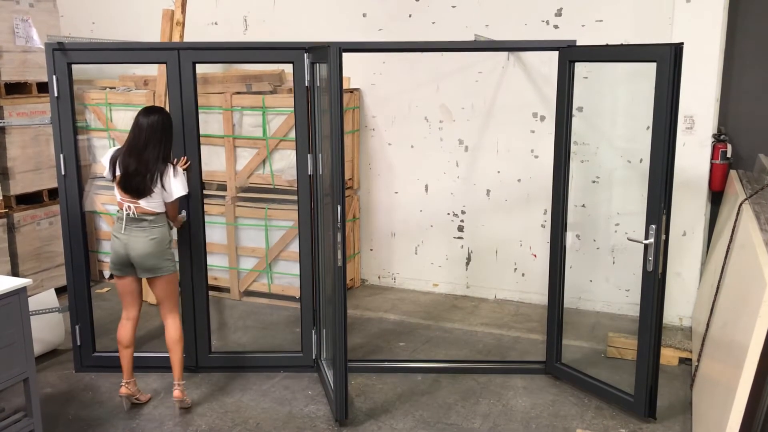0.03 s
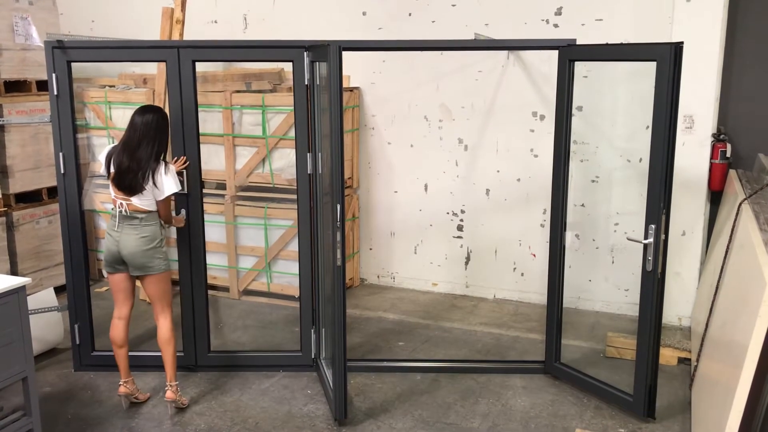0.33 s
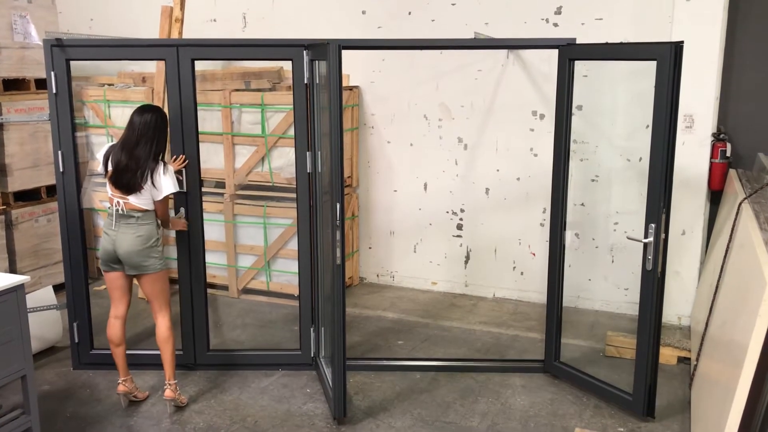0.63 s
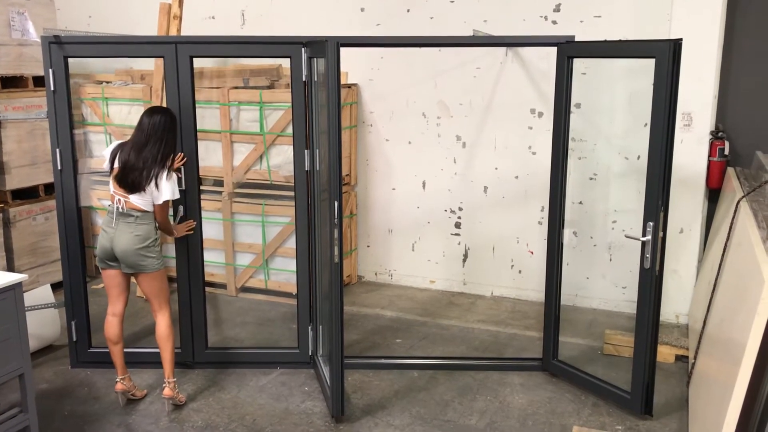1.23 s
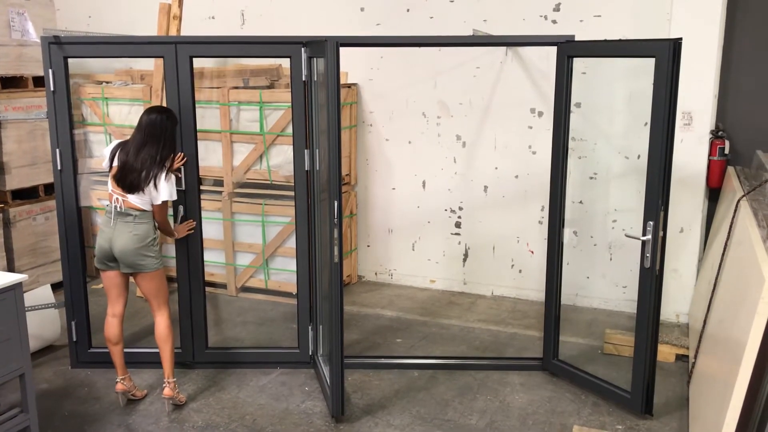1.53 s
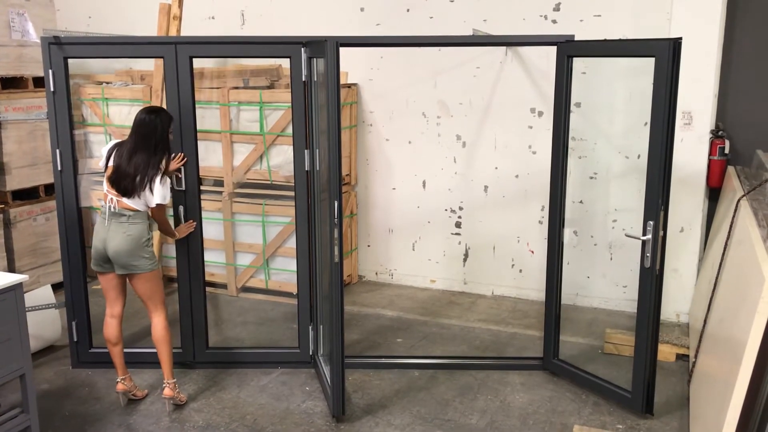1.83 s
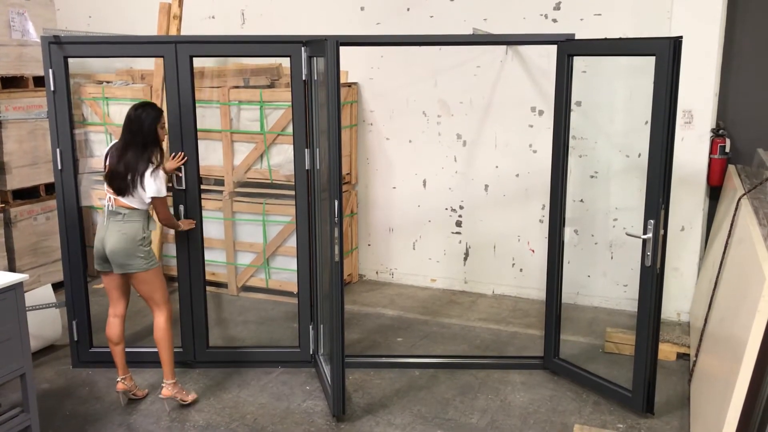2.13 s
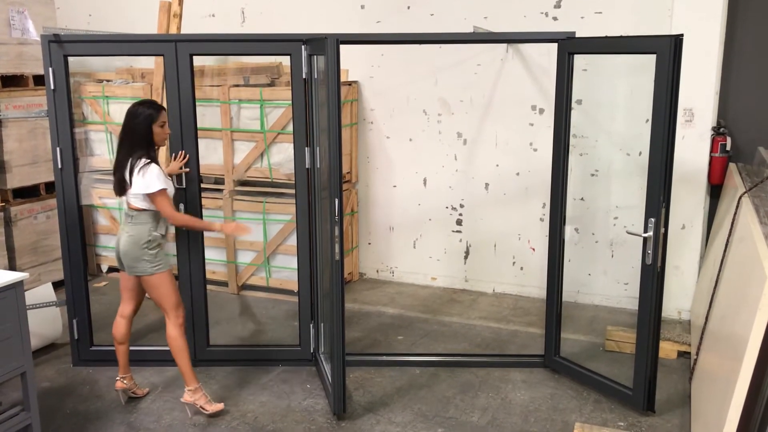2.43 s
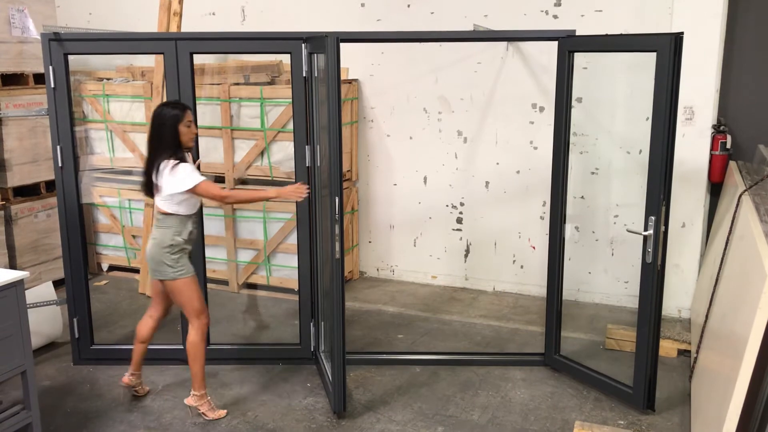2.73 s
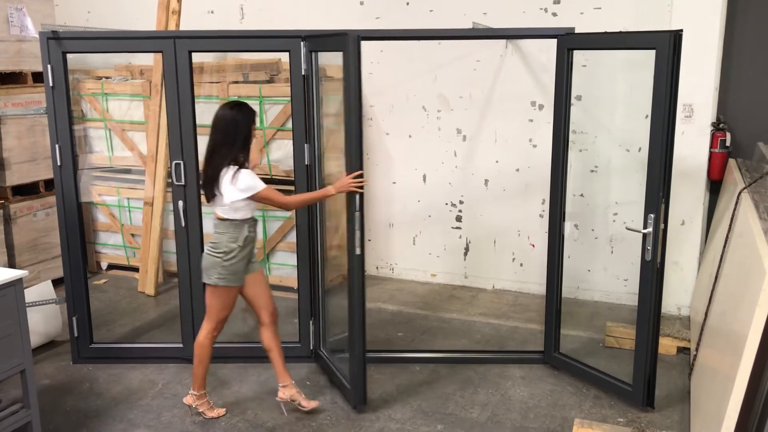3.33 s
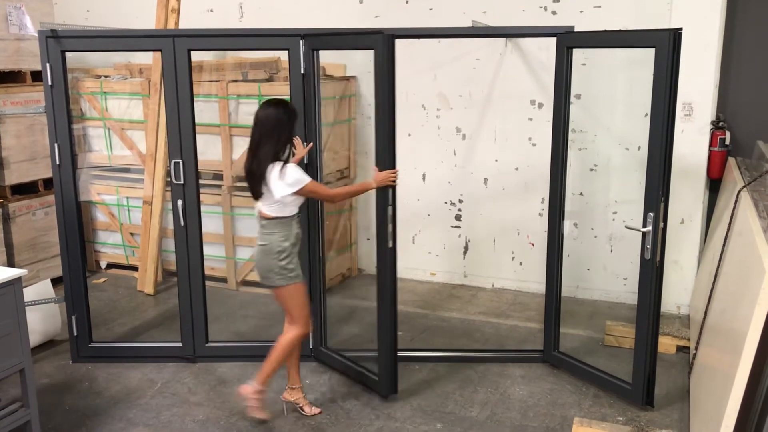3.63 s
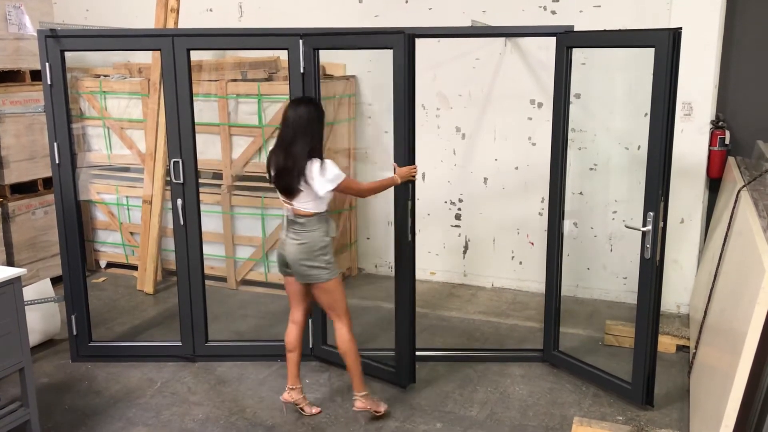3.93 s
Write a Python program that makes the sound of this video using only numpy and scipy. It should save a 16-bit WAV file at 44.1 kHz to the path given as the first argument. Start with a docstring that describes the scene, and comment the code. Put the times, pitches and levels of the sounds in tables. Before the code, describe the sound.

A folding door slides with a long, gritty, ringing scrape, following soft knocks and a latch clack.

```python
"""In a warehouse the latch of a glass bifold door is worked: two soft knocks, then a double clack.
Each impact excites the modes of the frame and thuds in the panel, and the hall reverberates.
Behind the door a stone saw idles and then bites: a long gritty scrape in which friction
makes the steel blade ring and sing for a moment, slowly damped as the cut deepens."""
import sys
import numpy as np
from scipy import signal
from scipy.fft import rfft, irfft, next_fast_len
from scipy.io import wavfile
from scipy.ndimage import map_coordinates

SR = 44100
rng = np.random.default_rng(int(sys.argv[2]) if len(sys.argv) > 2 else 0)


def to_wav(s):
    """Save 16-bit WAV."""
    ch = np.atleast_2d(s).T  # columns
    pcm = np.round(np.clip(ch, -1, 1) * 32767)  # PCM
    wavfile.write(sys.argv[1], SR, pcm.astype(np.int16))


N = 176400
TIME = np.arange(N) / SR
TOP_HZ = 15700


def amp(db):
    """Amplitude ratio of a level in decibels."""
    return 10 ** (np.asarray(db) / 20)


def unit(x):
    """Normalisation to rms 1."""
    return x / np.sqrt(np.mean(x ** 2) + 1e-20)


def along(points, hz):
    """Interpolation of (frequency, value) points on a logarithmic frequency axis."""
    freqs, values = np.transpose(points)
    return np.interp(np.log(hz + 1), np.log(freqs + 1), values)


def curves(rows):
    """Linear interpolation in time: one envelope for each column after the first."""
    times, *columns = np.transpose(rows)
    return [np.interp(TIME, times, column) for column in columns]


def wobble(per_s):
    """Slow random modulation: a spline through per_s Gaussian knots a second."""
    return map_coordinates(rng.standard_normal(4096), [TIME * per_s], mode="wrap")


def filtered(x, response):
    """Linear filtering: the spectrum of x times a frequency response."""
    size = next_fast_len(len(x) + SR // 4)
    return irfft(rfft(x, size) * response(np.fft.rfftfreq(size, 1 / SR)), size)[:len(x)]


def band(hz, lo_hz, hi_hz, order=12):
    """Magnitude response of a maximally flat band-pass."""
    return ((1 + (lo_hz / (hz + 1)) ** (2 * order)) * (1 + (hz / hi_hz) ** (2 * order))) ** -.5


def noise(spectrum):
    """Spectral shaping: white noise coloured by a spectrum, at rms 1."""
    return unit(filtered(rng.standard_normal(N), lambda hz: amp(along(spectrum, hz))))


def rubbed_mode(hz, width_hz, spread=1, flutter_db=2.86, rough_from_hz=12):
    """Line broadening: a friction-driven mode drifts in phase and flutters, less so when narrow."""
    drift = np.cumsum(spread * wobble(4 * width_hz)) * width_hz / (2 * SR)
    flutter = amp(flutter_db * min(1, width_hz / rough_from_hz) * wobble(2 * width_hz))
    return unit(flutter * np.sin(2 * np.pi * (hz * TIME + drift)))


# spectrum of the idling machine and the hall (frequency [Hz], relative density [dB])
IDLE_SPECTRUM = [(15, -43), (25, -22), (64, -3), (96, -7), (122, -4.5), (144, -9.5), (195, -12.5),
                 (246, -6), (267, -15.5), (399, -12.5), (480, -22.5), (598, -9), (666, -17.5), (871, -13.5),
                 (1240, -8), (1710, -9.5), (1850, -10.5), (2170, -11.5), (2630, -2.5), (3170, -9),
                 (3630, -9.5), (4500, -15), (5430, -7.5), (7500, -24), (8130, -23.5), (15500, -40.5)]
# mains hum and idle whine (frequency [Hz], rms level [dB], linewidth [Hz])
IDLE_TONES = [(56.8, -67, 8.8), (118.4, -65.5, 1.81), (985, -66.5, 32), (1817, -63, 9), (2630, -62, 82),
              (3535, -61, 3.87), (5810, -61, 120), (8300, -79, 68)]
# envelopes of the idle noise and a thin hiss (time [s], sway [dB], hiss level [dB])
IDLE_LEVELS = [(0, -4, -70), (.1, -2, -55.5), (.33, -2, -56), (.5, -1.7, -68), (.85, -2.5, -76),
               (1.1, -3, -87), (1.55, -3, -90), (1.7, -3, -88)]
# spectrum of the thin hiss (frequency [Hz], relative density [dB])
HISS_SPECTRUM = [(3000, -19), (6500, 2.5), (9700, 1.5), (12000, -5), (15500, -15)]


def idle(level_db=-45.5):
    """Superposition: the free-running machine's hum and whine, broadband noise and a fading hiss."""
    sway_db, hiss_db = curves(IDLE_LEVELS)
    tones = sum(amp(db) * rubbed_mode(hz, width_hz) for hz, db, width_hz in IDLE_TONES)
    broadband = amp(level_db + sway_db + 0.39 * wobble(31)) * noise(IDLE_SPECTRUM)
    return broadband + tones + amp(hiss_db) * noise(HISS_SPECTRUM)


# reverberation time of the hall (frequency [Hz], T60 [s])
HALL_T60 = [(100, 0.63), (500, 0.78), (1500, 0.84), (5000, 0.42), (12000, 0.1)]


def hall(x):
    """Reverberation: a diffuse field decays exponentially, the treble first."""
    hz, t, spectra = signal.stft(rng.standard_normal(SR), SR, nperseg=256)
    decay = amp(-60 * t / along(HALL_T60, hz)[:, None])
    tail = signal.istft(spectra * decay, SR, nperseg=256)[1]
    return signal.fftconvolve(x, tail / np.linalg.norm(tail))[:len(x)]


# impacts of latch on frame (time [s], level [dB], clack cutoff [Hz], ring gain [dB], thud pitch [Hz],
# thud gain [dB], hollow note [Hz], hollow gain [dB], tick gain [dB])
IMPACTS = [(0.0901, -33.5, 1300, -1, 350, -10, 590, -3.5, -33),
           (0.421, -39.5, 1900, -24, 290, -10, 721, 2, -26),
           (1.143, -28.5, 2240, 3.5, 141, -11.5, 596, -16, -15),
           (1.1544, -37, 3480, 2, 140, -10, 606, -20, -18),
           (1.198, -31.5, 1160, 4.5, 119, -17, 593, -5, -11),
           (1.2094, -39.5, 1200, -6, 120, 5, 643, -1, -3)]
# modes of the door frame (frequency [Hz], relative level [dB], T60 [s])
FRAME_MODES = [(346.7, -16, 0.19), (609, -20, 0.28), (870, -17, 0.11), (949, -4, 0.089), (1082, -2.5, 0.1),
               (1344, -3, 0.032), (1540, -10, 0.036), (1785, -21, 0.083)]
# spectrum of a clack (frequency [Hz], relative density [dB])
CLACK_SPECTRUM = [(80, -18), (300, -11), (600, -5.5), (1050, 0), (1600, -0.5), (2400, -1.5), (5000, 8.5),
                  (8000, -6), (15000, -16)]


def latch(build_cycles=1.5, hall_db=-5.5, ring_send_db=-9):
    """Impact excitation: each contact ticks, clacks, rings the frame and thuds in the panel."""
    out, t = np.zeros(N + SR), np.arange(SR) / SR

    def decay(db, t60_s):
        return amp(db - 60 * t / t60_s)

    def rise(tau_s):
        return 1 - np.exp(-t / tau_s)

    for s, db, dull_hz, ring_db, thud_hz, thud_db, hollow_hz, hollow_db, tick_db in IMPACTS:
        clack = filtered(noise(CLACK_SPECTRUM)[:SR], lambda hz: band(hz, 50, dull_hz, order=3))
        clack = unit(clack) * decay(0, t60_s=0.08)
        ring = sum(decay(ring_db + mode_db, t60_s) * rise(build_cycles / hz)
                   * np.sin(2 * np.pi * (hz * t + rng.random())) for hz, mode_db, t60_s in FRAME_MODES)
        hollow = decay(hollow_db, t60_s=0.14) * rise(0.0064) * np.sin(2 * np.pi * hollow_hz * t)
        thud = filtered(rng.standard_normal(SR), lambda hz: band(hz, thud_hz, thud_hz, order=3))
        thud = unit(thud) * decay(thud_db, t60_s=0.22) * rise(0.0091)
        tick = noise([(1500, -7), (4000, 4), (9000, -3), (15000, -13)])[:SR]
        tick *= decay(tick_db, t60_s=0.044)
        direct = (clack + ring + hollow + tick + thud) * rise(0.00056)
        reverb = hall(clack + tick + thud + amp(ring_send_db) * (ring + hollow))
        out[round(s * SR):][:SR] += amp(db) * (direct + amp(hall_db) * reverb)
    return out[:N]


# envelopes of the scrape's three bands (time [s], body level [dB], rasp level [dB], hiss level [dB])
CUT_LEVELS = [(1.74, -68, -54, -68), (1.77, -59, -60, -50), (1.8, -54, -53, -46.5),
              (1.86, -46.5, -39, -41.5), (1.99, -36.5, -34, -35.5), (2.1, -41, -32.5, -37),
              (2.62, -42, -37.5, -38), (2.82, -34, -30.5, -29.5), (3.11, -40.5, -33.5, -34),
              (3.46, -35.5, -32, -33.5), (3.61, -37.5, -32, -31), (3.7, -33.5, -30.5, -31),
              (4.0, -35.5, -31.5, -32)]
# spectrum of the scrape (frequency [Hz], relative density [dB])
SCRAPE_SPECTRUM = [(500, -49), (850, -10), (882, -56), (937, 4), (995, 2), (1080, -1), (1210, -0.5),
                   (1470, -3.5), (1660, -2), (1810, 2.5), (1940, -5), (2110, -12), (2450, -6.5),
                   (2630, -6.5), (2860, -2), (3830, -11), (4330, -7), (4830, -15.5), (5190, -12),
                   (6080, -6.5), (6700, -9), (9080, -10), (10400, -16.5), (13000, -21), (15500, -31)]
# envelope of the scrape's low edge (time [s], level [dB])
EDGE_LEVELS = [(1.74, -90), (1.98, -55.5), (2.55, -62), (2.82, -56), (3.26, -58.5), (4.0, -52)]


def scrape(grit_per_s=3500, grit_db=-3, judder_db=0.23, shimmer_db=-4.5, shimmer_t60_s=0.2, lift_db=1.5):
    """Shot noise: grit strikes the blade; the hall's reflections add a fine high shimmer."""
    grains = (rng.random(N) < grit_per_s / SR) * rng.standard_normal(N)
    rub = (rng.standard_normal(N) + amp(grit_db) * unit(grains)) * amp(judder_db * wobble(70))
    t = TIME[:SR // 4]
    reflections = rng.standard_normal(len(t)) * amp(-60 * t / shimmer_t60_s)
    shimmer = signal.fftconvolve(rub, reflections / np.linalg.norm(reflections))[:N]
    rub += amp(shimmer_db) * filtered(shimmer, lambda hz: band(hz, 2950, TOP_HZ, order=2))

    def part(lo_hz, hi_hz):
        return unit(filtered(rub, lambda hz: amp(along(SCRAPE_SPECTRUM, hz)) * band(hz, lo_hz, hi_hz)))

    body, rasp, hiss = amp(curves(CUT_LEVELS))
    edge = noise([(350, -11), (500, -7.5), (610, -2.5), (900, 4.5), (1100, -43), (2000, -70)])
    edge *= amp(curves(EDGE_LEVELS)[0])
    lower_bands = edge + body * part(956, 2000) + rasp * part(2100, 5040)
    return amp(lift_db) * lower_bands + hiss * part(4870, 18000)


# catches of the blade in the cut (time [s], relative level [dB])
CATCHES = [(2.01, -29.5), (2.1, -36), (2.19, -29), (2.3, -27.5), (2.41, -32), (2.5, -27.5), (2.63, -28.5),
           (2.72, -34.5), (2.83, -31), (2.9, -31), (2.99, -32), (3.08, -28), (3.2, -46), (3.42, -41),
           (3.53, -43), (3.63, -30.5), (3.71, -34), (3.79, -31), (3.89, -41), (3.97, -27)]


def catches(rise_s=0.024, t60_s=0.3):
    """Transient response: at each catch the middle modes' envelope swells, then decays freely."""
    return sum(np.exp(-(np.minimum(TIME - s, 0) / rise_s) ** 2)
               * amp(db - 60 * np.maximum(TIME - s, 0) / t60_s) for s, db in CATCHES)


# modes of the steel blade (frequency [Hz], level [dB], linewidth [Hz])
BLADE_MODES = [(972, -44, 12), (1022, -48, 15), (1145, -51.5, 14), (1247, -50.5, 18), (1354, -47, 12),
               (1399.5, -50.5, 12), (1509, -47, 17), (1657, -52.5, 17), (1774, -43.5, 11), (1831, -44, 10),
               (2347, -43.5, 7.6), (2395, -49.5, 7.3), (2520, -42, 7), (2680, -53, 20), (2800, -47, 30),
               (2940, -46, 55), (3330, -47.5, 28), (4033, -45.5, 9), (4186, -53.5, 12), (4260, -55, 16),
               (4425, -48.5, 24), (5216, -48, 35), (5336, -49.5, 29), (6320, -49.5, 52)]
# envelopes of the low ring, the singing and the high singing (time [s], relative level [dB])
LOW_SWELL = [(1.74, -59), (1.92, -33), (2.08, -44), (2.125, -28.5), (2.19, -34), (2.28, -28.5),
             (2.365, -29), (2.39, -40), (2.52, -36.5), (2.7, -61), (2.745, -25.5), (2.88, -37), (3, -43),
             (4, -41)]
SING_SWELL = [(1.74, -52), (1.83, -43.5), (1.95, -38), (2.07, -28), (2.2, -29.5), (2.32, -34),
              (2.45, -40.5), (2.62, -48), (2.8, -37.5), (3.1, -50), (4, -60)]
HIGH_SWELL = [(1.74, -82), (2.07, -51), (2.15, -39), (2.24, -36.5), (2.35, -37.5), (2.45, -48), (2.62, -48),
              (2.85, -50), (4, -51)]
# envelope of the mode that whistles on the hardest push (time [s], relative level [dB])
WHISTLE_SWELL = [(1.74, -85), (2.05, -37), (2.35, -37), (2.68, -54), (2.78, -29), (2.93, -33.5),
                 (3.02, -59), (4, -39)]


def blade(gain_db=0.5, wander_db=2.8, damped_from_s=2.103, damping_db_per_s=3.5, broaden_per_s=0.6):
    """Forced vibration: friction drives the modes; the deepening cut broadens them and damps some."""
    low, sing, high, whistle = [unit(amp(curves(rows)[0]))
                                for rows in (LOW_SWELL, SING_SWELL, HIGH_SWELL, WHISTLE_SWELL)]
    damped_s = np.maximum(TIME - damped_from_s, 0)
    damping = amp(-damping_db_per_s * damped_s)
    spread = 1 + broaden_per_s * damped_s
    body, rasp, hiss = amp(curves(CUT_LEVELS))
    middle = unit(catches() + amp(-8) * body)  # some ringing stays between catches
    low *= amp(0.8 * wobble(per_s=45))  # the lowest mode flutters
    # (from [Hz], to [Hz], envelope, random wander of each mode [dB])
    registers = [(0, 1000, low, 0), (1000, 1730, body * damping, wander_db),
                 (1730, 2100, middle, 0), (2100, 2600, sing, 0),
                 (2600, 3900, rasp, wander_db), (3900, 4380, high, 0),
                 (4380, 4800, whistle, 0), (4800, SR, hiss * damping, wander_db)]
    out = np.zeros(N)
    for hz, db, width_hz in BLADE_MODES:
        for lo_hz, hi_hz, swell, depth_db in registers:
            if lo_hz <= hz < hi_hz:
                envelope = unit(swell * amp(depth_db * wobble(per_s=11)))
                out += amp(db + gain_db) * envelope * rubbed_mode(hz, width_hz, spread)
    return out


def scene(contact_s=1.755, bite_s=0.07):
    """Superposition in mono: scrape and ringing join the door and the idle as the blade bites."""
    contact = np.clip((TIME - contact_s) / bite_s, 0, 1)
    mono = latch() + idle() + contact * (scrape() + blade())
    return np.array([mono, mono])


def record(dry):
    """Band limiting: an ideal low-pass removes everything above TOP_HZ."""
    return np.array([filtered(side, lambda hz: hz < TOP_HZ) for side in dry])


dry = scene()
out = record(dry)
to_wav(out)
```